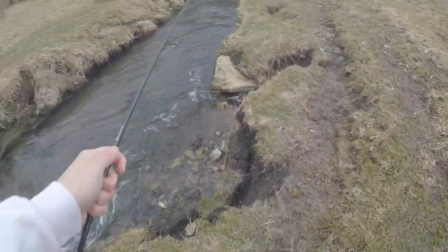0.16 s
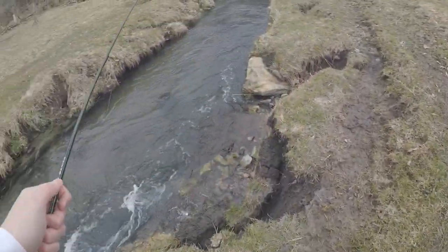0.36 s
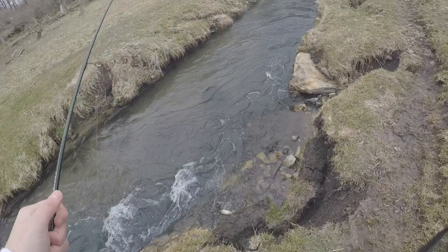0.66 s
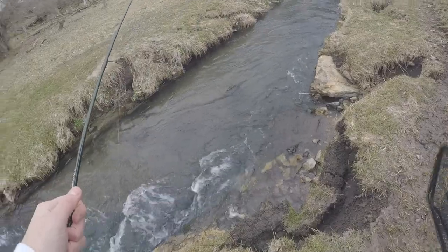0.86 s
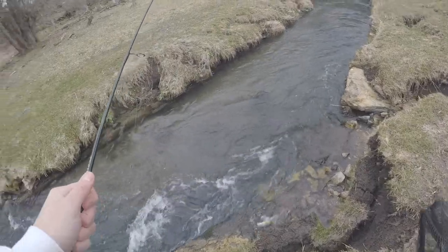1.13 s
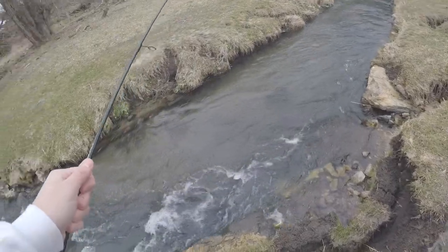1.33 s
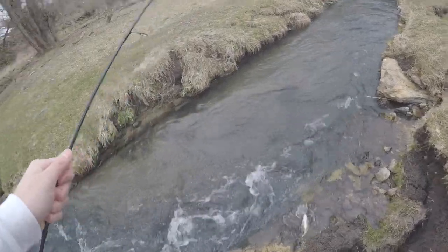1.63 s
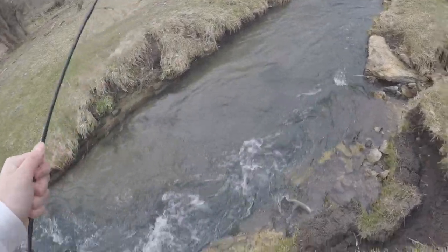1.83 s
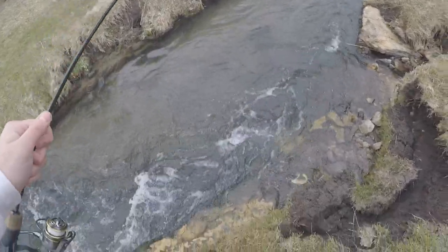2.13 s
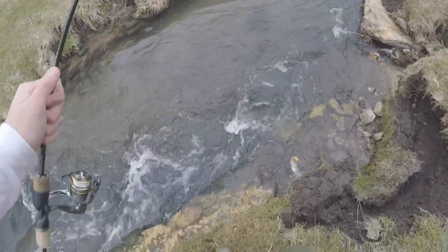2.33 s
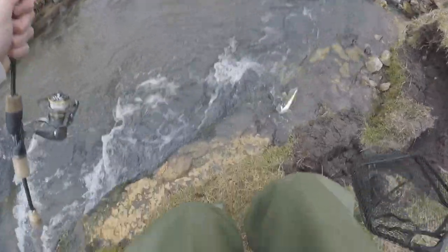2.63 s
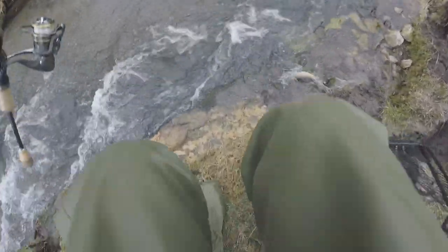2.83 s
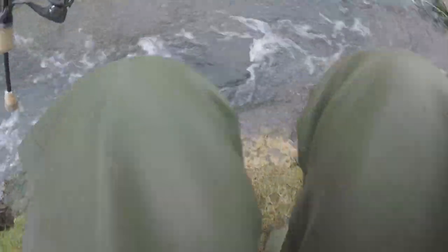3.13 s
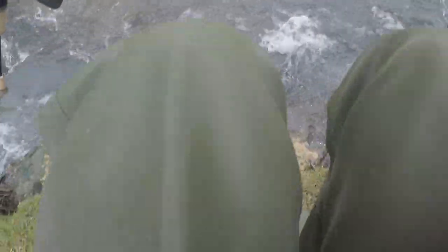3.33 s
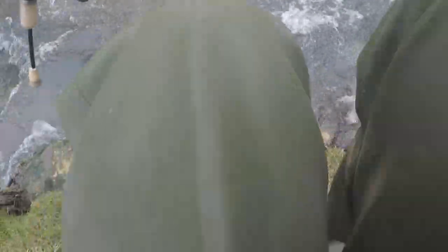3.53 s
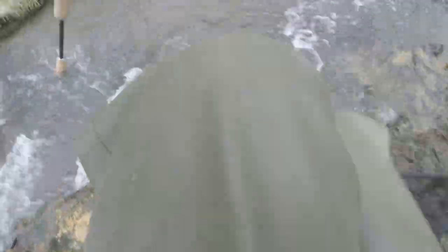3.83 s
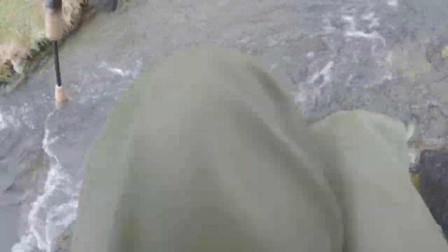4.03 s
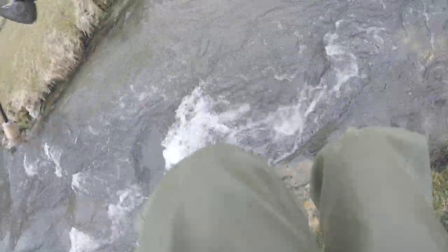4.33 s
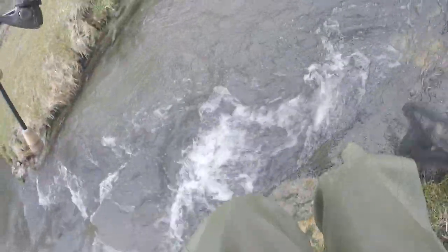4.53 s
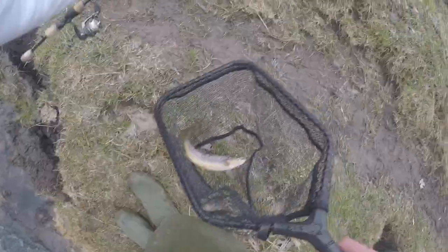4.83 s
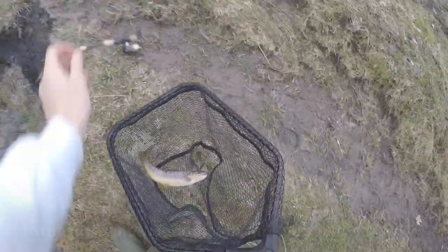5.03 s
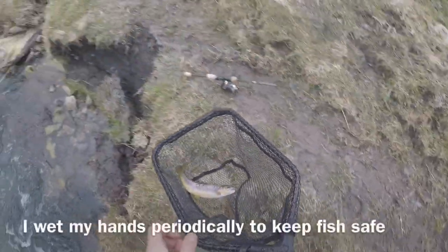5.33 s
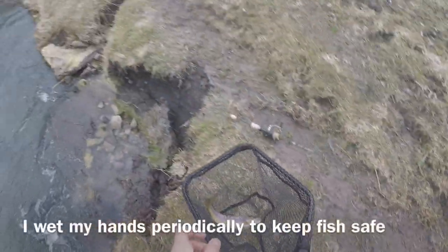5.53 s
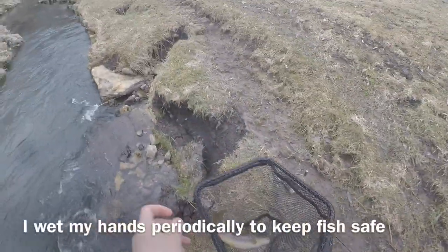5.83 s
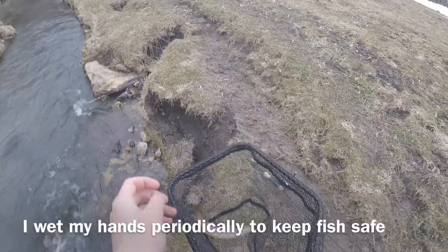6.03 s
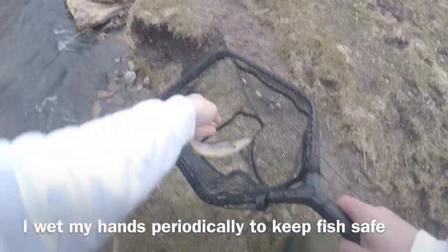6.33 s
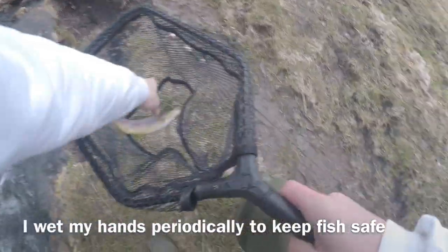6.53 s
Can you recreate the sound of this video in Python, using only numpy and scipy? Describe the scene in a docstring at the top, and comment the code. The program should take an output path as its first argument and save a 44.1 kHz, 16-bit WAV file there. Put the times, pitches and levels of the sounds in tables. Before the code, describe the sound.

Rushing brook water with low wind buffeting, cloth rubbing and small fishing-gear clicks, then a brief dip, weaker water, knocks and a net scuffing dry grass.

```python
"""A shallow creek rushes over stones, with bubbles ringing in it, beside an angler with a camera on the chest.
From the start wind rumbles on the microphone, tackle ticks, and waders rub and bump; the reel clinks once.
The rubbing is hardest in the crouch. After a brief fade near 4.8 s the water is behind the body and weaker.
Then the reel clinks again, the rod and the net's handle knock, and the net scuffs over dry grass.
Water is made of ringing bubbles and noise, wind and cloth of shaped noise, and contacts of short rings."""
import sys
import numpy as np
from scipy import signal
from scipy.fft import rfft, irfft, next_fast_len
from scipy.io import wavfile
from scipy.ndimage import uniform_filter1d, map_coordinates

SR = 44100
rng = np.random.default_rng(int(sys.argv[2]) if len(sys.argv) > 2 else 0)


def materialize(psi):
    """Save the field psi as 16-bit PCM at rate SR to the path in sys.argv[1].

    A 1-D psi becomes a single channel; in a 2-D psi each row is a channel.
    """
    bounded = np.clip(np.atleast_2d(psi).T, -1, 1)
    quanta = np.round(bounded * 32767).astype(np.int16)
    wavfile.write(sys.argv[1], SR, quanta)


N = 294147

# Creek at the microphone as the body turns to it and away, before the mix trims: t/s, level/dB
CREEK_LEVEL = [(0.0, -50), (0.35, -46.5), (0.8, -46.5), (1.05, -43.5), (1.45, -44.5), (1.65, -40.5),
               (2.0, -45.5), (2.45, -40.5), (2.9, -46), (3.4, -48.5), (4.0, -45), (4.2, -46), (4.78, -43),
               (4.82, -56.5), (5.25, -58.5), (5.6, -51.5), (6.4, -52), (6.67, -58.5)]
# Tone of the low murmur, as relative filter gain: f/Hz, level/dB
MURMUR_TONE = [(100, -41), (160, -30.5), (240, 4.5), (330, 0), (560, 1), (900, 5.5), (1200, 0.5),
               (1650, -1.5), (2400, -11.5), (4000, -63), (8000, -62)]
# Tone of the bright spray, as relative filter gain: f/Hz, level/dB
SPRAY_TONE = [(1000, -17), (2400, -10.5), (3400, -1.5), (4300, 0), (5000, -5.5), (6000, -13.5), (8000, -13),
              (10500, -11.5), (13000, -20.5), (15500, -31)]
# Single large bubbles: t/s, peak level/dB, starting f/Hz, life/s
LARGE_BUBBLES = [(0.456, -42, 357.4, 0.03944), (0.478, -40, 401, 0.035), (1.046, -36.5, 437, 0.015),
                 (3.048, -34, 2243, 0.0068), (3.235, -35.5, 373, 0.0364), (3.565, -33.5, 1028, 0.031),
                 (4.176, -39.5, 2684, 0.0175), (5.551, -38, 3807, 0.0082), (5.615, -32, 469, 0.011)]
# Hard ticks of rod, reel and line, 2 dB below the mixed peak: t/s, level/dB, f/Hz
TACKLE_TICKS = [(0.076, -33.5, 4700), (0.206, -37.5, 9100), (0.353, -33.5, 3050), (0.604, -33.5, 4750),
                (0.982, -35, 5000), (2.086, -37.5, 4392), (2.276, -27, 4180), (2.33, -23.5, 4640),
                (2.332, -25.5, 5200), (2.960, -33, 6930), (3.530, -35, 12100), (3.63, -35, 6624),
                (3.752, -29, 3330), (3.7717, -21, 3230), (5.018, -29.5, 3740), (5.420, -42, 10000)]
# Clinks of small metal parts of the reel: t/s, peak level/dB, brightness/(dB per octave)
REEL_CLINKS = [(1.7858, -13.5, -1.5), (4.9678, -20.5, 5)]
# Ringing tones of the reel, before the brightness is added: f/Hz, level/dB, time to fall 60 dB/s
REEL_TONES = [(1740, -17, .035), (5180, -13, .03), (6370, -4, .018), (7100, 0, .018), (10500, -6, .018)]
# The rod laid down and the knock of the net's handle:
# t/s, peak level/dB, push f/Hz, push length/s, ring f/Hz, ring level against the push/dB
HANDLING_KNOCKS = [(5.0215, -17.5, 525, 0.000746, 219.2, -5), (5.752, -13, 372.6, 0.00171, 91, -8.5)]
# The net scuffing over dry grass: t/s, peak level/dB, f/Hz, length of the drag/s
NET_SCUFFS = [(5.477, -31, 1010, 0), (5.814, -22, 866, .02), (5.8451, -25, 890, .055),
              (5.9722, -27, 1914, 0), (6.1222, -32, 2233, 0), (6.247, -32, 910, 0), (6.406, -28.5, 807, 0)]
# Soft bumps of clothes against the camera: t/s, peak level/dB, f/Hz
CLOTH_BUMPS = [(0.3545, -30.5, 780), (0.856, -29, 401), (1.346, -28, 903), (2.35, -26, 220),
               (2.473, -22.5, 290), (2.481, -29, 360), (2.528, -28.5, 410), (2.745, -20, 427),
               (2.767, -23, 740), (2.805, -22.5, 610), (2.973, -27, 326), (3.378, -28, 999),
               (3.486, -27, 484), (3.554, -24.5, 194), (3.719, -25, 691.3), (3.773, -24, 202),
               (3.796, -26.5, 181), (4.111, -23.5, 370.4), (4.227, -27.5, 938), (4.497, -24, 860)]
# How hard sleeves and waders rub, hardest in the crouch: t/s, effort level/dB
RUBBING_EFFORT = [(0.0, -49), (0.9, -44), (1.9, -46), (2.45, -39), (3.2, -39), (3.65, -35.5), (4.1, -36.5),
                  (4.7, -41), (4.85, -46.5), (5.35, -49), (5.9, -44), (6.67, -42.5)]
# Single sweeps of an arm or knee: t/s, length/s, rise of rub level/dB, rise of swish level/dB
LIMB_STROKES = [(1.325, 0.114, 8, 6.5), (1.607, 0.118, 14.5, 10.5), (2.49, 0.073, 5, -0.5),
                (2.716, 0.141, 8.5, 1.5), (3.078, 0.039, 1, 7), (3.398, 0.074, 6, 0), (5.642, .11, 8, 3)]
# Tone of the dull rubbing, as relative filter gain: f/Hz, level/dB
RUB_TONE = [(70, -32), (140, -11), (190, 0.5), (400, 3), (700, 0.5), (1100, -15), (2000, -19),
            (5000, -30.5)]
# Tone of the brighter swish, as relative filter gain: f/Hz, level/dB
SWISH_TONE = [(400, -5.5), (900, 5.5), (1500, 5.5), (2500, -1), (3600, -8), (5000, -16.5), (6500, -40.5),
              (10000, -30), (15000, -43.5)]
# Strength of the breeze on the microphone, before gusts and mix trims: t/s, level/dB
BREEZE_STRENGTH = [(0.0, -30.5), (0.4, -22), (0.92, -29), (1.3, -20), (1.9, -24.5), (2.3, -21), (2.65, -29),
                   (2.95, -25.5), (3.2, -35), (3.6, -28), (4.32, -37), (4.72, -28.5), (4.87, -47.5),
                   (5.9, -50.5), (6.4, -31), (6.67, -42)]
# Single gusts on top of the breeze: t/s, length/s, change of breeze level/dB
BREEZE_GUSTS = [(0.734, 0.0925, -0.5), (1.096, 0.09, 10.5), (1.454, 0.137, 7), (1.72, 0.139, 9),
                (2.13, 0.082, 8.5), (2.834, 0.164, 12), (3.991, 0.061, 6.5), (4.527, 0.1, 13)]
# Single eddies that thump on the microphone port: t/s, peak level/dB, f/Hz
EDDY_THUMPS = [(0.737, -32.5, 86), (1.094, -25.5, 43.85), (1.188, -22, 88.8), (1.697, -21, 71),
               (2.859, -29.5, 78.63), (2.894, -21, 74)]
# Tone of the huge slow eddies, as relative filter gain: f/Hz, level/dB
SWAY_TONE = [(1, -29), (4, -0.5), (8, -1.5), (14, -4), (24, -24.5), (50, -50.5), (100, -93)]
# Tone of the rumbling eddies, as relative filter gain: f/Hz, level/dB
RUMBLE_TONE = [(4, -43), (14, 1), (24, -1.5), (34, -5.5), (50, -16), (80, -25.5), (120, -33), (180, -70.5),
               (400, -97)]
# Tone of the fast fluttering eddies, as relative filter gain: f/Hz, level/dB
FLUTTER_TONE = [(30, -16.5), (55, 10.5), (80, 2), (115, -7.5), (160, -13.5), (220, -45.5), (400, -44.5)]

MURMUR_DB, MURMUR_FOLLOWS = -24, 0.464  # the body shades the murmur's long waves less than the spray
TICK_Q, TICK_HZ = 1.445, 3987  # sharpness at that pitch; higher ticks are drier
TICK_Q_FALL = 1  # power by which sharpness falls with pitch
SLIP_GAP_S, SLIP_DB = 0.014, -5.5  # a dragged net slips again and again, more softly than at first
CONTACT_S = 0.001225  # sets how fast a soft bump swells and dies
RUB_DB, SWISH_DB = -4, -5.5  # levels against the effort
FLUTTER_DB, FLUTTER_GROWS = -20, 1.063  # starting level; its dB per dB of breeze
FADE_S, FADE_HALF_S = 4.80, 0.0333  # silent moment; time of the fade on each side of it
TOP_HZ = 15600  # nothing above this is heard


def creek():
    """Large bubbles babble in churning water; droplets patter and fine bubbles fizz in white water."""
    spray_db = curve(CREEK_LEVEL)
    babble = bubbles(count=3000, low_hz=260, high_hz=2400, cycles=18, rise=.18, spread_db=2.5)
    drops = bubbles(count=1600, low_hz=900, high_hz=4500, cycles=9, rise=.1, spread_db=3.2)
    murmur = coloured(patchy(depth_db=1.3) + amp(-4.5) * babble + amp(-5) * drops, MURMUR_TONE)

    fizz = bubbles(count=4000, low_hz=2000, high_hz=11000, cycles=22, rise=.1, spread_db=3.4)
    bursts = crackle(count=5000, spread_db=6)
    white_water = patchy(depth_db=.8) + amp(-6) * fizz + amp(-9) * bursts + amp(-11) * drops
    spray = coloured(white_water, SPRAY_TONE)

    murmur_db = MURMUR_DB + MURMUR_FOLLOWS * spray_db + .5 * wobble(23)
    moving_spray_db = spray_db - 1.0 + 1.3 * wobble(25)
    return amp(murmur_db) * murmur + amp(moving_spray_db) * spray


def gurgles():
    """A big bubble swells, rings and glides upward in pitch."""
    track = np.zeros(N)
    for s, db, hz, life in LARGE_BUBBLES:
        t = np.arange(int(3 * life * SR)) / SR
        age = t / life
        tone = np.sin(2 * np.pi * hz * t * (1 + 0.0555 * age))
        add(track, s, db, tone * age * np.exp(-3.5 * age))
    return track


def tackle():
    """Rod and line tick as short dry resonances; the reel's metal rings briefly in several tones."""
    track, t = np.zeros(N), np.arange(SR // 20) / SR
    for s, db, hz in TACKLE_TICKS:
        q = TICK_Q * (TICK_HZ / hz) ** TICK_Q_FALL
        add(track, s, db + 2, decay(t, .016) * resonant_noise(hz, q, count=len(t)))
    for s, db, bright_db in REEL_CLINKS:
        ring = np.zeros(len(t))
        for hz, level, t60 in REEL_TONES:
            tone = np.sin(2 * np.pi * (hz * t + rng.random()))
            ring += amp(level + bright_db * np.log2(hz)) * decay(t, t60) * tone
        crack = amp(-14) * decay(t, .015) * resonant_noise(8000, q=1, count=len(t))
        rattle = amp(-22) * decay(t, .045) * resonant_noise(2600, q=1, count=len(t))
        add(track, s, db, ring / np.abs(ring).max() + crack + rattle)
    return track


def knocks():
    """A solid blow is one brief swing of pressure, then the struck thing rings low and short."""
    lead = .005  # s of sound before the middle of the blow
    track, t = np.zeros(N), np.arange(SR // 12) / SR - lead
    after = np.maximum(t, 0)
    for s, db, hz, length, ring_hz, ring_db in HANDLING_KNOCKS:
        push = np.cos(2 * np.pi * hz * t) * np.exp(-(t / length) ** 2)
        ring = -np.sin(2 * np.pi * ring_hz * after) * amp(ring_db) * decay(after, 0.0424)
        noise = resonant_noise(757, q=1.45, count=len(t))
        rattle = (t > 0) * amp(-18) * decay(after, 0.035) * noise
        add(track, s - lead, db, push + ring + rattle)
    return track


def net():
    """Each slip of the net over the grass is a crisp snap with a hollow ring of its frame."""
    track, t = np.zeros(N), np.arange(SR // 20) / SR
    for s, db, hz, drag in NET_SCUFFS:
        slips = [(s, db)]
        for k in range(int(drag / SLIP_GAP_S)):
            delay = SLIP_GAP_S * (k + 1 + rng.normal(0, .15))
            slips.append((s + delay, db + SLIP_DB))
        for slip_s, slip_db in slips:
            tone = np.sin(2 * np.pi * hz * t)
            ring = decay(t, .024) * (tone + .5 * resonant_noise(hz, q=2.5, count=len(t)))
            snap = amp(-7) * decay(t, .01) * resonant_noise(3200, q=1, count=len(t))
            add(track, slip_s, slip_db, ring + snap)
    return track


def bumps():
    """A soft contact gives a quick push that dies within a few cycles, with a little scrape."""
    track, t = np.zeros(N), np.arange(SR // 16) / SR
    age = t / CONTACT_S
    for s, db, hz in CLOTH_BUMPS:
        push = np.sin(2 * np.pi * hz * t) * age ** 2 * np.exp(-age)
        scrape = amp(-10) * decay(t, .035) * resonant_noise(750, q=1, count=len(t))
        add(track, s, db, push / np.abs(push).max() + scrape)
    return track


def cloth():
    """Fabric catches and slips in uneven clumps: a dull rub and a brighter swish grow with effort."""
    effort_db = curve(RUBBING_EFFORT)
    rub_db, swish_db = effort_db + RUB_DB, effort_db + SWISH_DB
    for s, length, rub_rise, swish_rise in LIMB_STROKES:
        rub_db += rub_rise * swell(s, length)
        swish_db += swish_rise * swell(s, length)
    grip_db = 1.4 * wobble(45)
    rub = coloured(patchy(depth_db=4.0) + amp(-2.5) * crackle(count=1600, spread_db=4.5), RUB_TONE)
    swish = coloured(patchy(depth_db=0.5) + amp(-2) * crackle(count=4000, spread_db=1.0), SWISH_TONE)
    return amp(rub_db + grip_db) * rub + amp(swish_db + grip_db) * swish


def wind():
    """Huge slow eddies sway the air; smaller ones rumble and flutter on the microphone port."""
    wind_db = curve(BREEZE_STRENGTH)
    for s, length, db in BREEZE_GUSTS:
        wind_db += db * swell(s, length)
    sway = amp(0.555 * wind_db - 10.5) * eddies(SWAY_TONE)
    rumble = amp(wind_db - 3.5 + 1.45 * wobble(9.6)) * eddies(RUMBLE_TONE)
    flutter_db = FLUTTER_DB + FLUTTER_GROWS * wind_db + 1.88 * wobble(22.04)
    air = sway + rumble + amp(flutter_db) * eddies(FLUTTER_TONE)
    half = .04  # s on each side of a thump's middle
    t = np.arange(-half, half, 1 / SR)
    for s, db, hz in EDDY_THUMPS:
        thump = np.cos(2 * np.pi * hz * t) * np.exp(-(hz * t / 0.575) ** 2)
        add(air, s - half, db, thump)
    return air


def eddies(spectrum):
    """Turbulent pressure whose swings are of fairly even size."""
    swirl = signal.hilbert(coloured(rng.standard_normal(N), spectrum))
    return unit(swirl.real / np.sqrt(np.abs(swirl) ** 2 + 1))  # large swings are held down


def bubbles(count, low_hz, high_hz, cycles, rise, spread_db):
    """Each bubble rings for some cycles and rises in pitch as it nears the surface."""
    start = rng.integers(0, N, (count, 1))
    hz = low_hz * (high_hz / low_hz) ** rng.random((count, 1))
    strength = np.minimum(rng.exponential(size=(count, 1)), 4)
    size = amp(spread_db * strength) * np.sqrt(hz)
    k = np.arange(int(min(cycles / low_hz, .05) * SR))
    turns = hz * k / SR
    age = turns / cycles
    tone = np.sin(2 * np.pi * turns * (1 + rise * age / 2))
    ring = size * tone * amp(-40 * age) * (1 - np.exp(-turns))
    return unit(np.bincount((start + k).ravel(), ring.ravel())[:N])


def crackle(count, spread_db):
    """Tiny impulses at random times, mostly small and a few large."""
    strength = np.minimum(rng.exponential(size=count), 5)
    size = amp(spread_db * strength) * rng.choice([-1, 1], count)
    return unit(np.bincount(rng.integers(0, N, count), size, N))


def patchy(depth_db):
    """White noise with short patches of random gain in time and frequency."""
    z = signal.stft(rng.standard_normal(N), nperseg=512)[2]
    field = uniform_filter1d(rng.standard_normal(z.shape), size=4, axis=0)  # smooth over frequency
    field = uniform_filter1d(field, size=7, axis=1)  # smooth over time
    return unit(signal.istft(z * amp(depth_db * unit(field)), nperseg=512)[1][:N])


def resonant_noise(hz, q, count):
    """Noise of rms 1 in one broad resonance, filtered twice for steep skirts."""
    b, a = signal.iirpeak(min(hz, SR / 3), max(q, 1), SR)
    once = signal.lfilter(b, a, rng.standard_normal(count))
    return unit(signal.lfilter(b, a, once))


def coloured(x, spectrum):
    """Filter x by (f/Hz, level/dB) points and scale it to rms 1."""
    f, db = np.transpose(spectrum)
    return unit(filtered(x, lambda hz: amp(np.interp(np.log(hz + 1), np.log(f), db))))


def filtered(x, response):
    """Multiply the spectrum of x by a response that depends on frequency."""
    size = next_fast_len(N + SR // 2)
    return irfft(rfft(x, size) * response(np.fft.rfftfreq(size, 1 / SR)), size)[:N]


def add(track, s, db, sound):
    """Mix a short sound in at time s, scaled so that its peak is at db."""
    part = track[round(s * SR):][:len(sound)]
    part += (amp(db) * sound / np.abs(sound).max())[:len(part)]


def curve(rows):
    """Join (time, value) points by straight lines, one value per sample."""
    s, value = np.transpose(rows)
    return np.interp(np.arange(N) / SR, s, value)


def wobble(rate):
    """A smooth random curve through rate random points a second."""
    points = rng.standard_normal(int(N * rate / SR) + 4)
    return map_coordinates(points, [np.arange(N) * rate / SR])


def swell(s, length):
    """A smooth rise and fall, 1 at time s."""
    return np.exp(-(2 * (np.arange(N) / SR - s) / length) ** 2)


def decay(t, t60):
    """A steady dying away that falls 60 dB in t60 seconds."""
    return amp(-60 * t / t60)


def amp(db):
    """Decibels to gain."""
    return 10 ** (np.asarray(db) / 20)


def unit(x):
    """Scale to rms 1."""
    return x / np.sqrt(np.mean(x ** 2) + 1e-20)


def scene():
    """All sources add up as air pressure at the one microphone."""
    water = creek() + gurgles()
    handling = tackle() + knocks() + net()
    clothes = bumps() + cloth()
    return (water + handling + clothes + wind())[None]


def record(dry):
    """The sound fades out and straight back in; nothing passes the band limit."""
    fade = np.minimum(np.abs(np.arange(N) / SR - FADE_S) / FADE_HALF_S, 1)
    return filtered(dry[0] * fade, lambda hz: hz < TOP_HZ)[None]


dry = scene()
out = record(dry)
materialize(out)
```